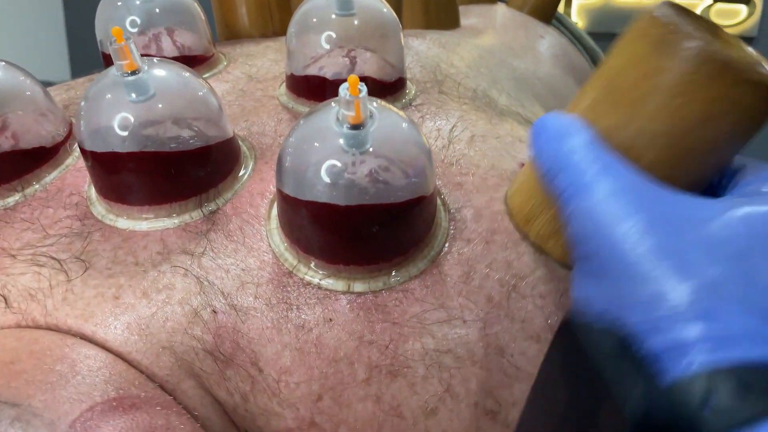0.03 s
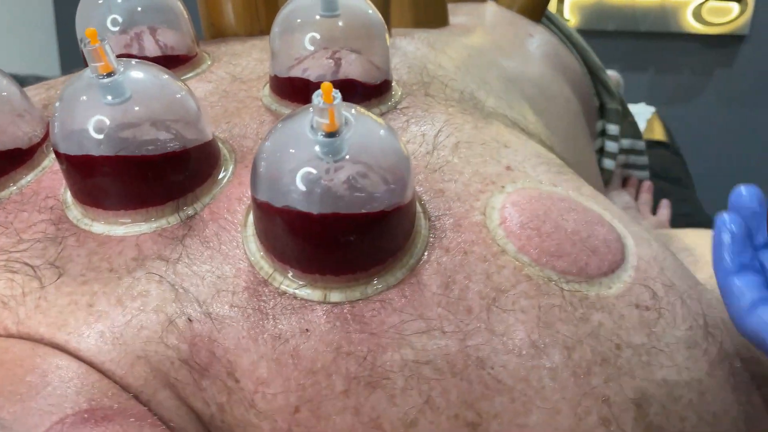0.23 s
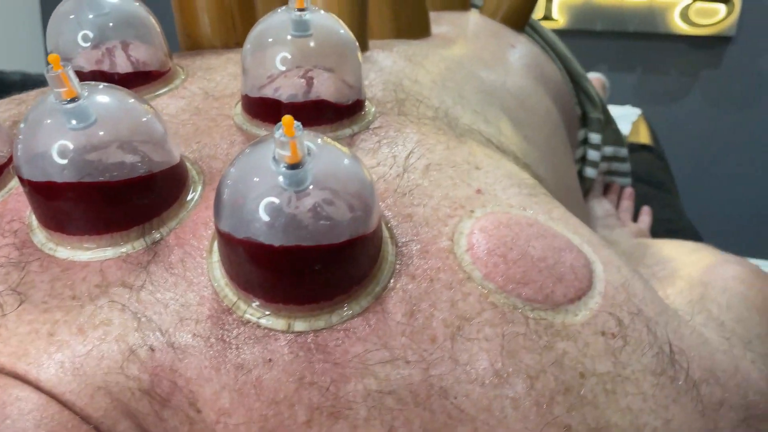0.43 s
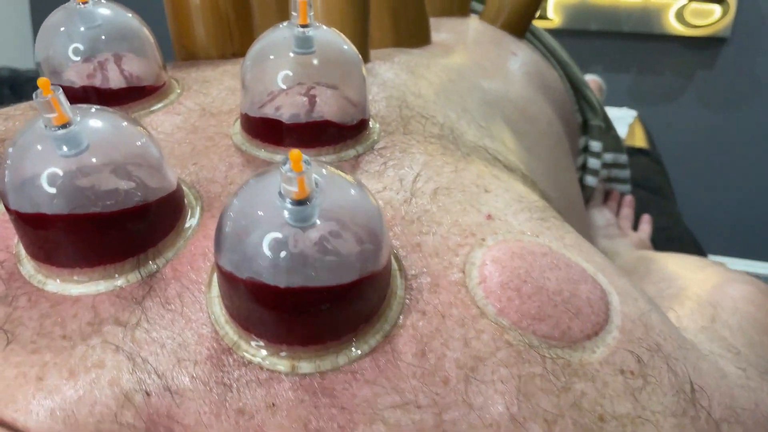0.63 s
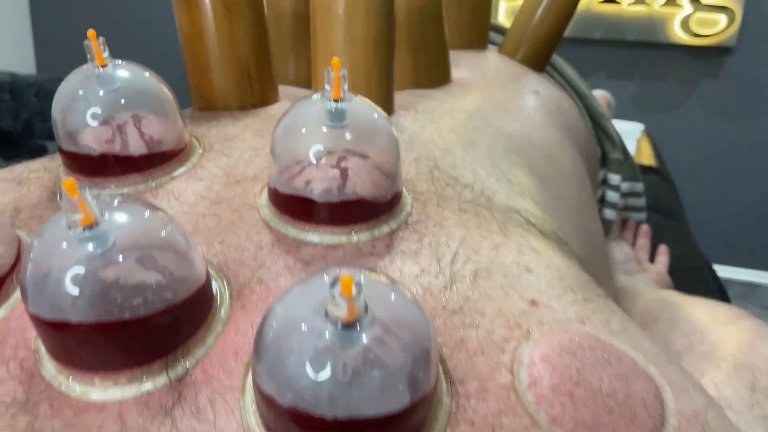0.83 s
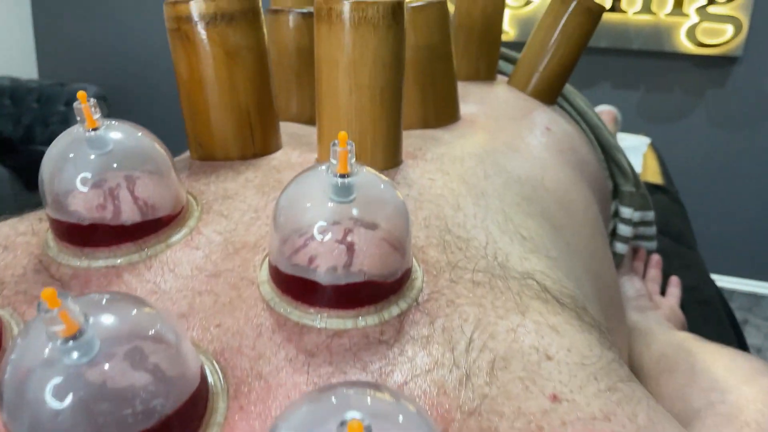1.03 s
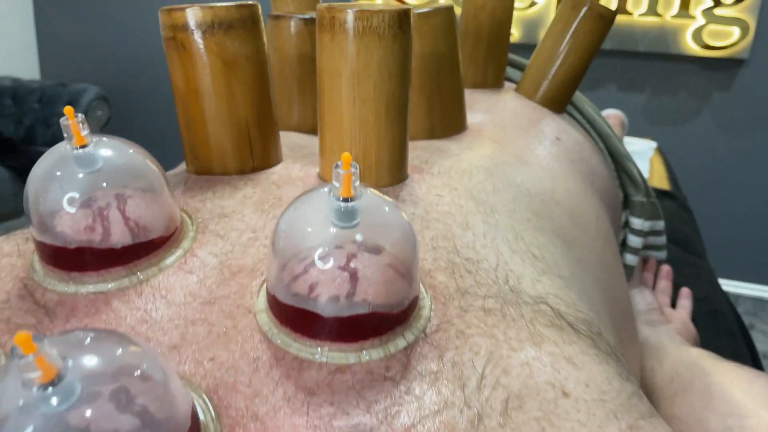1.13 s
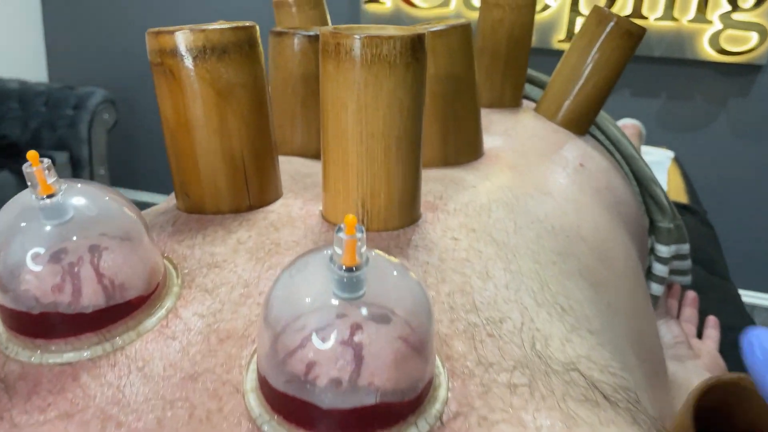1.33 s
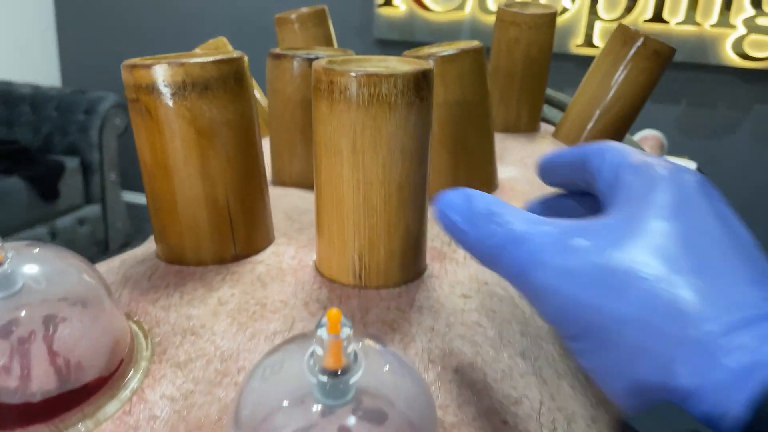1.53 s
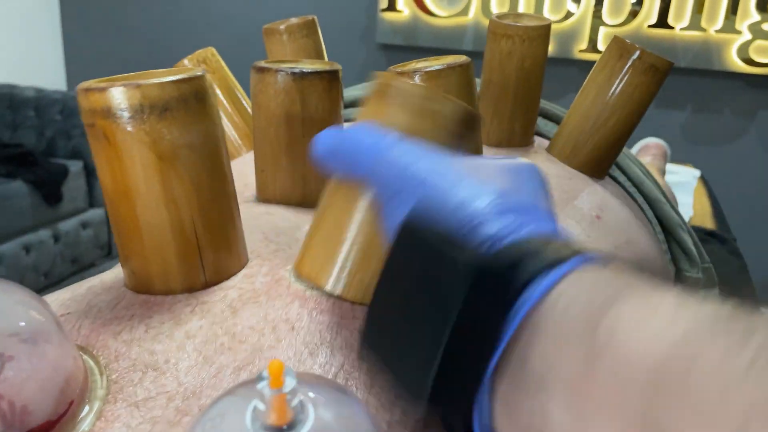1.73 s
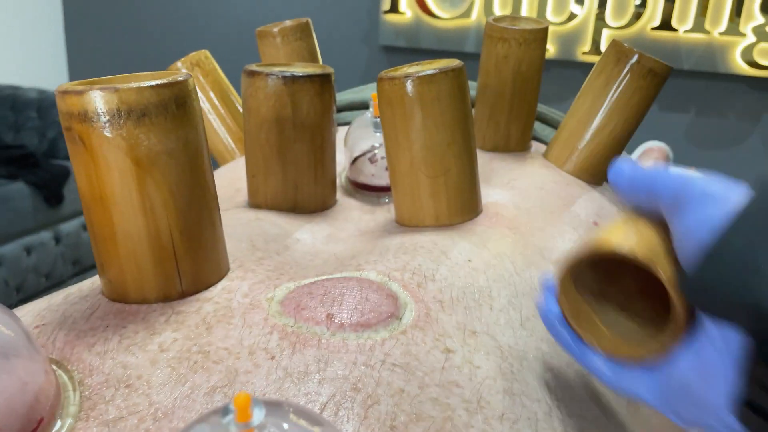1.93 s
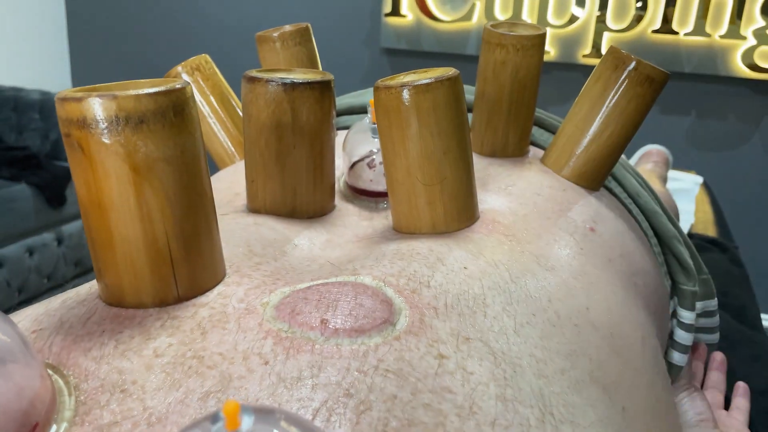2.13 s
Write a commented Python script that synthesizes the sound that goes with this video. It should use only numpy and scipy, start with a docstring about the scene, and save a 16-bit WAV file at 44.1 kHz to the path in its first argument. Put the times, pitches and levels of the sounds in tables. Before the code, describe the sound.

Two suction cups pop off skin in a quiet room, with faint glove rustles between.

```python
"""Two bamboo suction cups are pulled off skin, close to a microphone in a small, quiet room.
First a rim creaks and leaks. At 0.1 s air rushes in and the cavity rings, its pitch shooting up as
the gap opens; the pop overloads the microphone and hangs in the room while the flesh thumps back.
Gloves then tick and rustle, and cloth shifts on the couch. At 1.77 s the second cup pops, a little
higher, and a few soft rubs and knocks follow."""
import sys
import numpy as np
from scipy import signal
from scipy.fft import rfft, irfft
from scipy.io import wavfile

SR = 44100
rng = np.random.default_rng(int(sys.argv[2]) if len(sys.argv) > 2 else 0)


def wav_record(signal):
    """Record a signal, one row per channel, as 16-bit PCM in the file named by sys.argv[1]."""
    frames = np.transpose(np.atleast_2d(signal))
    bounded = np.clip(frames, -1, 1)
    # unit amplitude maps onto the largest positive 16-bit level
    quanta = np.round(bounded * 32767).astype(np.int16)
    wavfile.write(sys.argv[1], SR, quanta)


N = 97020

# Noise spectra (f/Hz, relative spectral level/dB)
ROOM_TONE_SPECTRUM = [(20, -28.5), (45, -7.5), (90, 1), (150, -2.5), (260, -9), (500, -16.5), (800, -13.5),
                      (1200, -19), (5900, -28), (16000, -41.5)]
HISS_SPECTRUM = [(300, -22), (1500, -6.5), (3200, -2), (7000, -6.5), (11000, -16), (16000, -25)]
CLOTH_SPECTRUM = [(50, -5), (170, -2), (300, -3), (600, -5.5), (1200, -10), (3000, -25.5), (12000, -42)]
GLOVE_SPECTRUM = [(100, 0.5), (400, 9.5), (1000, 0), (1800, -4.5), (3200, -0.5), (6000, -2), (9000, -6.5),
                  (12000, -15), (16000, -18.5)]
INRUSH_SPECTRUM = [(200, -4), (900, 9), (1500, -2), (2700, 4), (4000, 1), (6000, 2.5), (8500, 0.5),
                   (12000, -6), (16000, -11)]
PEAK_HISS_SPECTRUM = [(300, -7), (1500, -1), (5000, -2.5), (9000, -7.5), (16000, -18.5)]
# Course of the faint treble hiss (t/s, level/dB)
HISS_LEVELS = [(0, -57), (.5, -71), (.62, -59.5), (.85, -60), (.95, -61), (1.05, -68.5), (1.3, -60),
               (1.519, -72), (2.2, -67)]
# Reverberation by band (f/Hz, T60/s, level/dB)
REVERB_BANDS = [(60, .3, -20.5), (142, 0.49, -20.5), (221, 0.39, -17.5), (415, 0.37, -12.5),
                (580, 0.37, -13.5), (780, .32, -21), (1300, .33, -21.5), (2400, .36, -19),
                (4200, .38, -21.5), (8000, .33, -25.5), (15000, .24, -20)]
# First reflections off nearby walls (delay/s, level/dB)
WALL_ECHOES = [(.0205, -18), (.0375, -26.5), (0.0643, -33.5)]
# Body and cloth shifting on the couch (t/s, duration/s, level/dB)
CLOTH_STROKES = [(.47, 0.1, -56.5), (.62, 0.2, -59), (.81, 0.13, -57), (1.05, 0.13, -57.5),
                 (1.172, 0.033, -45.5), (1.475, 0.034, -49), (1.54, 0.18, -64.5), (1.692, .018, -33),
                 (1.72, 0.025, -30), (1.93, 0.12, -50)]
# Gloves rubbing on skin (t/s, duration/s, level/dB)
GLOVE_STROKES = [(.025, 0.084, -42), (.132, .011, -18.5), (0.58, .11, -54.5), (1.09, .075, -57),
                 (1.162, 0.066, -44.5), (1.235, .075, -52.5), (1.32, .1, -57.5), (1.55, .12, -62.5),
                 (1.692, 0.028, -43), (1.716, 0.034, -29), (1.93, 0.14, -50), (2.165, 0.037, -48.5)]
# Rim and gloves snapping on skin (t/s, level/dB, centre f/Hz, decay/s)
SKIN_SNAPS = [(0.061, -35.5, 5000, 0.00098), (0.065, -31.5, 5500, .001), (0.074, -37.5, 800, .001),
              (.1385, -16.5, 1600, 0.0034), (.141, -16, 5500, 0.0017), (.221, -37.5, 4500, 0.0066),
              (0.271, -43.5, 5000, 0.0019), (0.4158, -42.5, 4900, 0.0012), (.499, -40.5, 4493, .001),
              (0.6238, -29.5, 5200, .0007), (1.1846, -33.5, 965, .003), (1.2467, -27, 6000, .0015),
              (1.289, -40.5, 5000, 0.0025), (1.3412, -34, 6000, 0.0028), (1.4458, -35.5, 700, 0.00078),
              (1.4692, -35, 5500, 0.00054), (1.522, -46.5, 5200, 0.002), (1.574, -36.5, 5500, 0.00053),
              (1.6894, -20.5, 4500, 0.0007), (1.6894, -22.5, 750, 0.0025), (1.717, -24, 3000, .0006),
              (1.7183, -17, 2800, 0.0015), (1.7374, -26, 4500, 0.0017), (1.738, -10, 4200, .0008),
              (1.7462, -11.5, 6000, .0005), (1.7602, 0, 1200, 0.00065), (1.799, -23, 4500, .004),
              (1.8734, -28, 3200, 0.0016), (2.1565, -23, 3600, 0.0013), (2.1566, -28.5, 800, 0.0025),
              (2.1859, -28.5, 5500, 0.0018)]
# Knocks of hand and cup on flesh (t/s, mid-glide f/Hz, level/dB, decay/s)
FLESH_THUMPS = [(0.039, 172, -25.5, 0.0083), (0.139, 170, -1.5, 0.009), (0.177, 110, -10.5, 0.0081),
                (0.284, 161, -52, 0.0062), (0.504, 180, -37, 0.0036), (0.554, 205, -39.5, .006),
                (.699, 115, -33, .01), (0.884, 108, -34.5, .016), (1.182, 221, -29.5, .008),
                (1.444, 190, -38.5, .004), (1.689, 190, -3.5, 0.002), (1.718, 160, -19, .008),
                (1.746, 120, -23, .014), (1.802, 150, 5.5, 0.003), (1.831, 100, -6.5, 0.0049),
                (2.043, 188, -31, 0.0041), (2.1563, 202, -16, 0.0023)]
# Upper air modes of the cups (cup index, f/Hz, relative level/dB)
UPPER_MODES = [(0, 3845, 3), (0, 4194, -4.5), (0, 4680, -5.5), (0, 6600, -7), (1, 2430, -5.5), (1, 4490, 3),
               (1, 4700, 1), (1, 5040, -1.5), (1, 7650, -4), (1, 9700, -4.5)]
# Cups coming off (t/s, open-cup f/Hz, glide time constant/s, ring level/dB, ring hold/s,
# inrush level/dB, inrush rise/s, upper-mode level/dB)
CUP_RELEASES = [(.1035, 780, .0049, 11.5, 0.016, -6.5, 0.0028, -17),
                (1.771, 852.3, .0047, 11, 0.011, -5.5, 0.0028, -23.5)]

RING_ATTACK_S, RING_DECAY_S, LINGER_DB, LINGER_DECAY_S = .0037, .005, -33.5, .045
INRUSH_FALL_S, INRUSH_TAIL_S, INRUSH_TAIL_DB = .0054, .011, -14
THUMP_SAG, THUMP_SAG_S = .25, .012
SNAP_Q, SNAP_LOWPASS_HZ = .8, 9500
RUB_EDGE_SHARE, GRAIN_DB, GRAIN_S = .31, 5.5, .0012
ROOM_TONE_DB, WAVER_DB, REVERB_DELAY_S, REVERB_BUILD_S = -60, 5, .006, .007
CLIP_LEVEL, CLIP_KNEE, PEAK_HISS_DB, LOW_CUT_HZ, HIGH_CUT_HZ = .68, 15, -18, 10, 16300


def undb(db):
    """Amplitude ratio: tenfold for every 20 dB."""
    return 10 ** (np.asarray(db) / 20)


def clock():
    """Uniform sampling times, t/s."""
    return np.arange(N) / SR


def noise(spectrum):
    """Spectral shaping: white noise is weighted by a spectrum and scaled to unit rms."""
    hz, db = np.array(spectrum).T
    f = np.maximum(np.fft.rfftfreq(N, 1 / SR), 1)
    gain = undb(np.interp(np.log(f), np.log(hz), db))
    shaped = irfft(rfft(rng.standard_normal(N)) * gain, N)
    return shaped / shaped.std()


def waver(step_s):
    """Random modulation: Gaussian values joined by straight lines."""
    return np.interp(clock() / step_s, np.arange(N), rng.standard_normal(N))


def envelope(age, attack, decay, hold=0):
    """Exponential build-up and, after the hold, exponential damping; times in s."""
    age = np.maximum(age, 0)
    return (1 - np.exp(-age / attack)) * np.exp(-np.maximum(age - hold, 0) / decay)


def background():
    """Amplitude-modulated noise: a low room tone wavers under a faint hiss."""
    hiss = undb(np.interp(clock(), *np.array(HISS_LEVELS).T)) * noise(HISS_SPECTRUM)
    return undb(ROOM_TONE_DB + WAVER_DB * waver(step_s=.04)) * noise(ROOM_TONE_SPECTRUM) + hiss


def reverberation(direct):
    """Diffuse field: dense reflections decay exponentially, each band at its own rate."""
    age = clock() - REVERB_DELAY_S
    f = np.maximum(np.fft.rfftfreq(N, 1 / SR), 1)
    scatter = rfft(rng.standard_normal(N))
    log_centres = np.log(np.array(REVERB_BANDS)[:, 0])
    response = 0
    for selector, (_, t60, db) in zip(np.eye(len(REVERB_BANDS)), REVERB_BANDS):
        band = np.interp(np.log(f), log_centres, selector)
        tail = irfft(scatter * band, N) * envelope(age, REVERB_BUILD_S, t60 / np.log(1000))
        response += undb(db) * tail * np.sqrt(np.mean(band ** 2) / np.sum(tail ** 2))
    return signal.fftconvolve(direct, response)[:N]


def echoes(direct):
    """Specular reflection: each near wall returns a delayed, weaker copy."""
    t = clock()
    return sum(undb(db) * np.interp(t - delay, t, direct, left=0) for delay, db in WALL_ECHOES)


def rubs(strokes, spectrum):
    """Stick-slip friction: rubber, skin or cloth gives grainy noise that swells and fades."""
    swell = 0
    for start, length, db in strokes:
        edge = RUB_EDGE_SHARE * length
        swell += undb(db) * envelope(clock() - start, edge, edge, hold=length - edge)
    grain = undb(GRAIN_DB * waver(GRAIN_S))
    return swell * noise(spectrum) * grain / np.sqrt(np.mean(grain ** 2))


def snaps():
    """Impulsive excitation: each slip on skin sends a noise burst through a broad resonance."""
    out = np.zeros(N)
    for start, db, hz, decay in SKIN_SNAPS:
        omega = 2 * np.pi * hz / SR
        damp = np.sin(omega) / (2 * SNAP_Q)
        shape = envelope(clock() - start, attack=.00035, decay=decay)
        burst = (shape + 1e-18) * rng.standard_normal(N)
        for _ in range(2):  # two passes steepen the sides of the band
            burst = signal.lfilter([damp, 0, -damp], [1 + damp, -2 * np.cos(omega), 1 - damp], burst)
        out += undb(db) * burst * np.sqrt(np.sum(shape ** 2) / np.sum(burst ** 2))
    return signal.sosfilt(signal.butter(1, SNAP_LOWPASS_HZ, fs=SR, output="sos"), out)


def thumps():
    """Damped oscillation: knocked flesh wobbles for a cycle or two, sagging in pitch."""
    out = np.zeros(N)
    for start, hz, db, decay in FLESH_THUMPS:
        age = np.maximum(clock() - start, 0)
        glide = 2 * np.exp(-age / THUMP_SAG_S) - 1
        pitch = hz * (age > 0) * (1 + THUMP_SAG * glide)
        wobble = np.sin(2 * np.pi * np.cumsum(pitch) / SR)
        out -= undb(db) * envelope(age, attack=.0012, decay=decay) * wobble
    return out


def pops():
    """Cavity resonance: air rushes through the gap and the cup rings, rising as the rim lifts clear."""
    out, air = np.zeros(N), noise(INRUSH_SPECTRUM)
    for cup, (start, hz, rise, ring_db, hold, air_db, air_rise, modes_db) in enumerate(CUP_RELEASES):
        age = clock() - start
        after = np.maximum(age, 0)
        pitch = hz * (1 - np.exp(-after / rise))
        ring = envelope(age, RING_ATTACK_S, RING_DECAY_S, hold)
        linger = undb(LINGER_DB) * envelope(age, RING_ATTACK_S, LINGER_DECAY_S)
        out += undb(ring_db) * (ring + linger) * np.sin(2 * np.pi * np.cumsum(pitch) / SR)
        leak = np.exp(np.minimum(age, 0) / air_rise)  # grows until the release
        fall = np.exp(-after / INRUSH_FALL_S) + undb(INRUSH_TAIL_DB) * np.exp(-after / INRUSH_TAIL_S)
        out += undb(air_db) * air * leak * fall
        mode_shape = envelope(age, attack=rise, decay=.018)
        for mode_cup, mode_hz, mode_db in UPPER_MODES:
            if mode_cup == cup:
                out += undb(modes_db + mode_db) * mode_shape * np.sin(2 * np.pi * mode_hz * after)
    return out


def scene():
    """Superposition: direct sound, reflections and background add in one channel."""
    direct = pops() + thumps() + snaps()
    direct += rubs(GLOVE_STROKES, GLOVE_SPECTRUM) + rubs(CLOTH_STROKES, CLOTH_SPECTRUM)
    return (direct + echoes(direct) + reverberation(direct) + background())[None]


def record(dry):
    """Saturation: loud peaks clip flat, and a rough hiss sounds while they clip; band edges are cut."""
    gain = 1 / (1 + np.abs(dry / CLIP_LEVEL) ** CLIP_KNEE) ** (1 / CLIP_KNEE)
    peak_hiss = undb(PEAK_HISS_DB) * (1 - gain) * noise(PEAK_HISS_SPECTRUM)
    low_cut = signal.butter(1, LOW_CUT_HZ, "high", fs=SR, output="sos")
    high_cut = signal.ellip(8, .2, 70, HIGH_CUT_HZ, fs=SR, output="sos")
    return signal.sosfilt(high_cut, signal.sosfilt(low_cut, dry * gain + peak_hiss))


dry = scene()
out = record(dry)
wav_record(out)
```